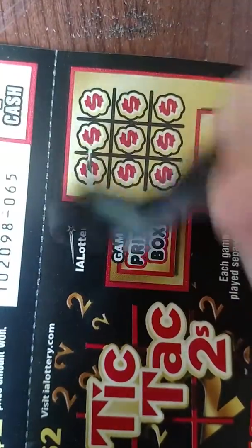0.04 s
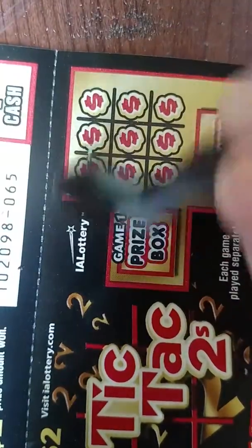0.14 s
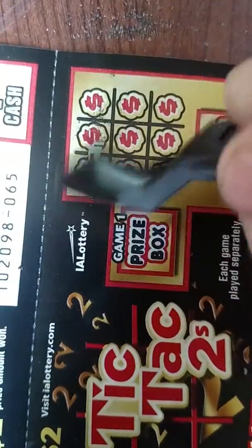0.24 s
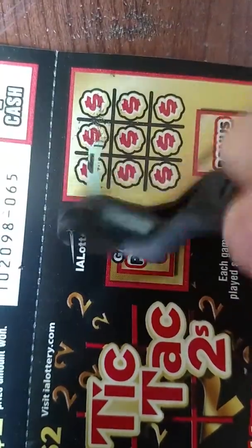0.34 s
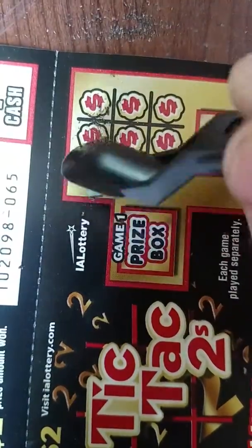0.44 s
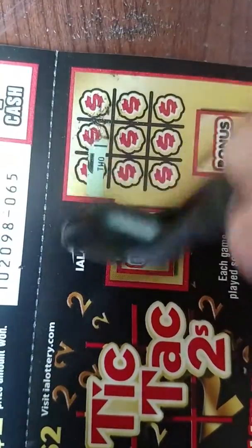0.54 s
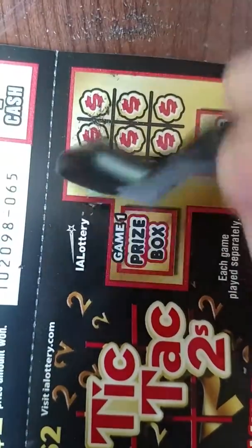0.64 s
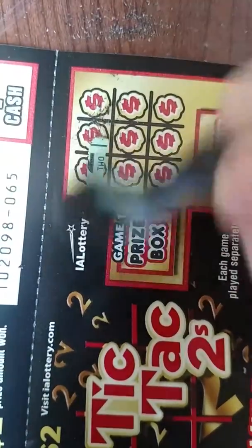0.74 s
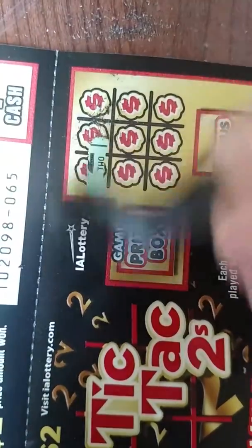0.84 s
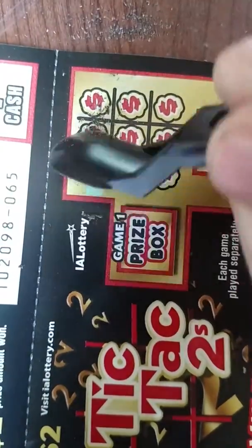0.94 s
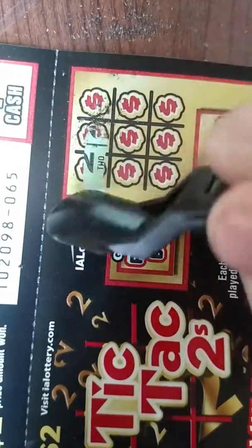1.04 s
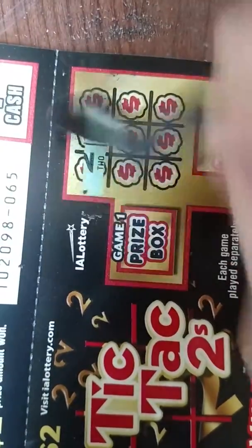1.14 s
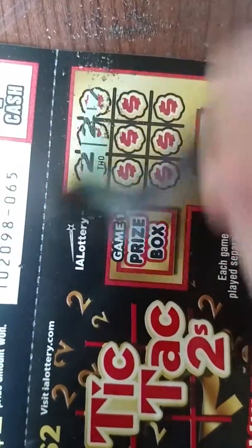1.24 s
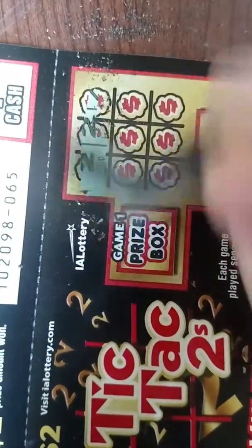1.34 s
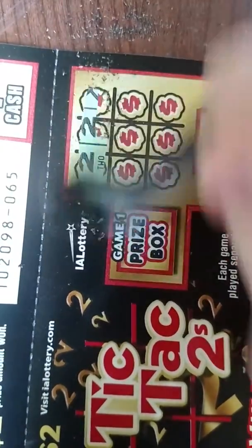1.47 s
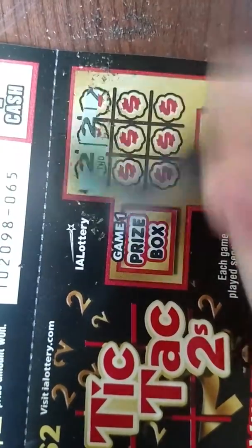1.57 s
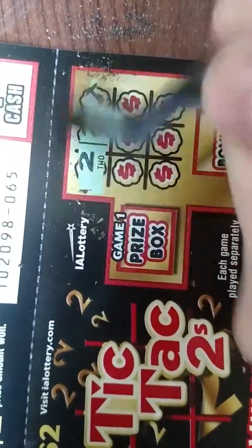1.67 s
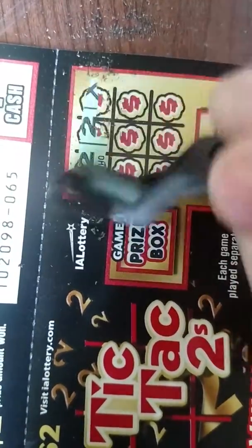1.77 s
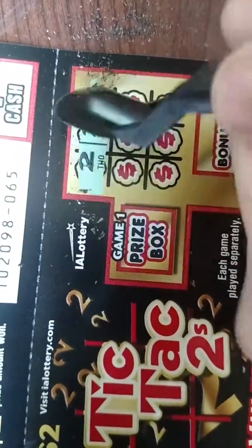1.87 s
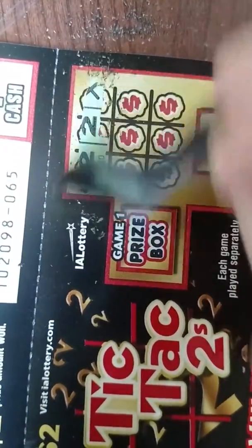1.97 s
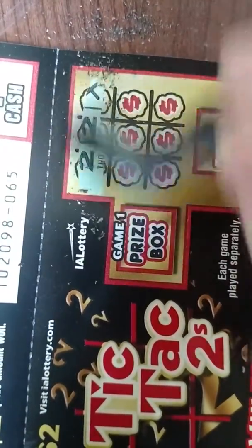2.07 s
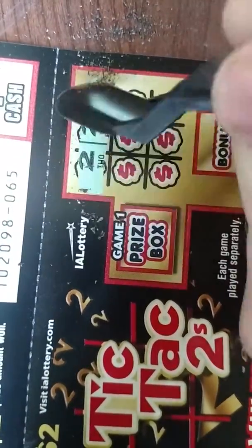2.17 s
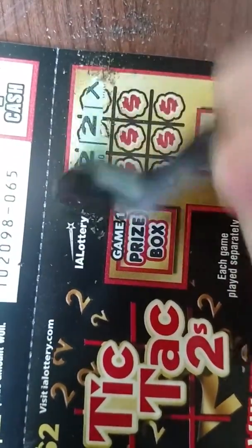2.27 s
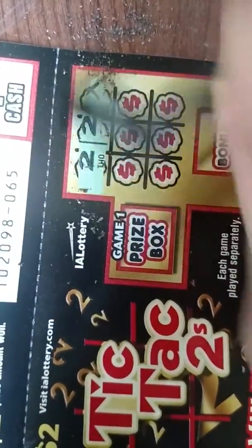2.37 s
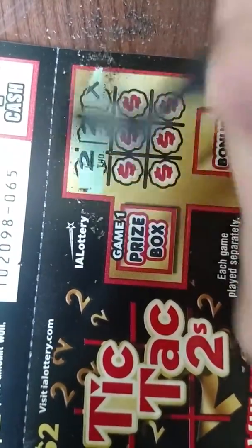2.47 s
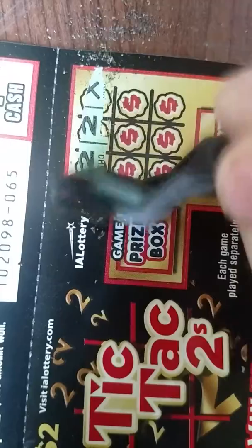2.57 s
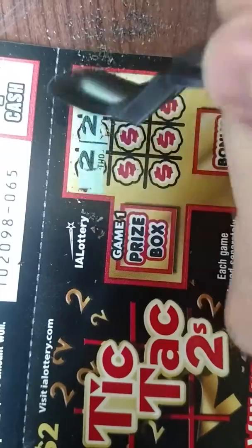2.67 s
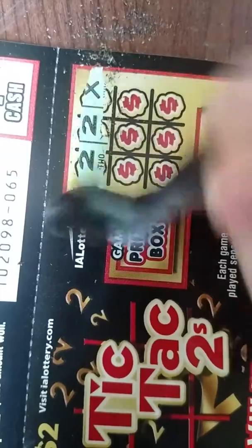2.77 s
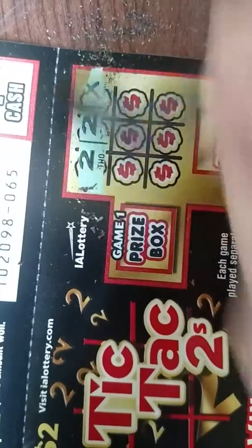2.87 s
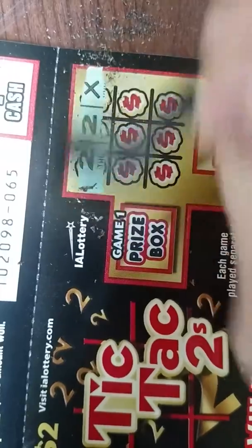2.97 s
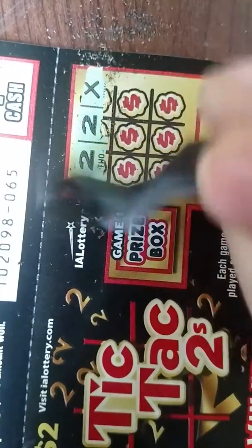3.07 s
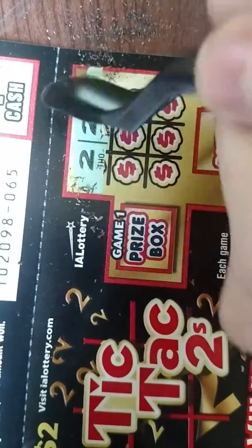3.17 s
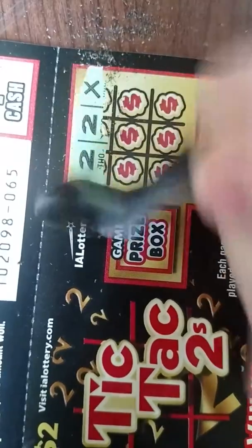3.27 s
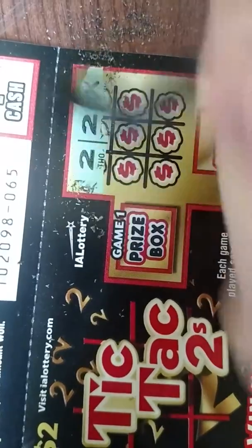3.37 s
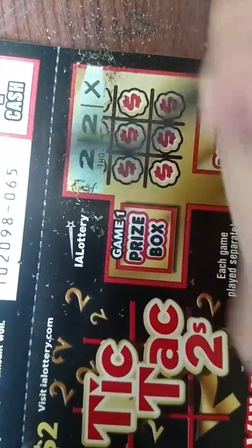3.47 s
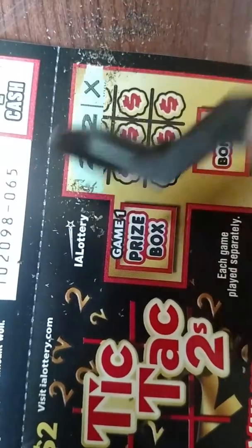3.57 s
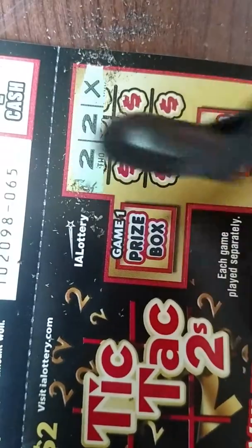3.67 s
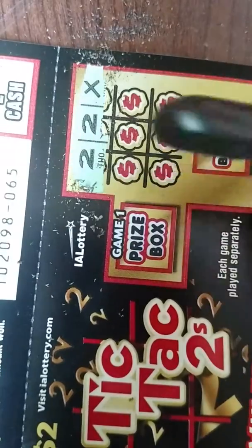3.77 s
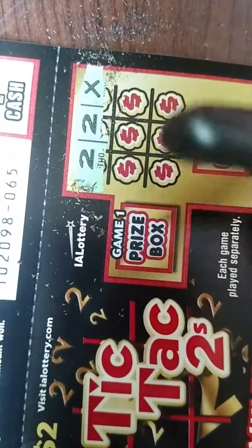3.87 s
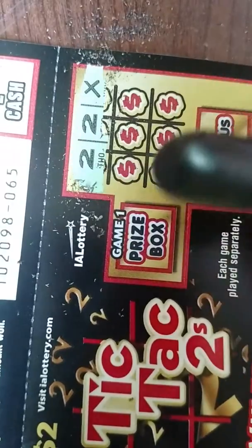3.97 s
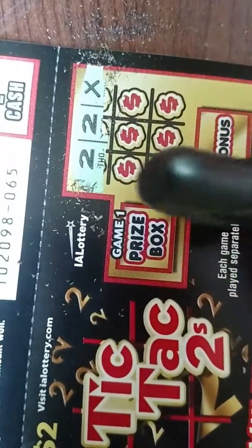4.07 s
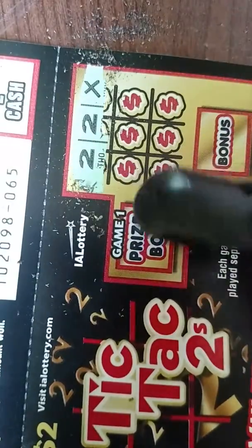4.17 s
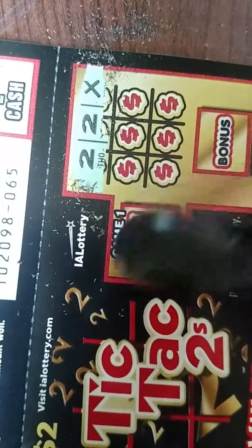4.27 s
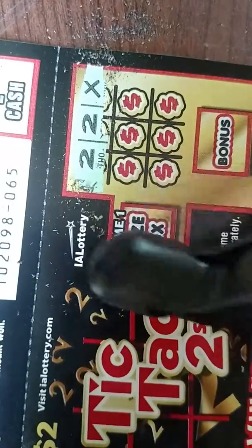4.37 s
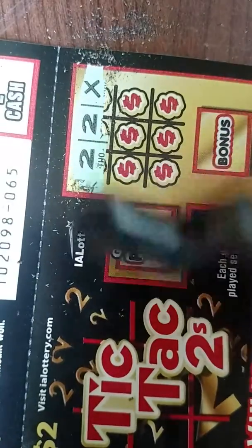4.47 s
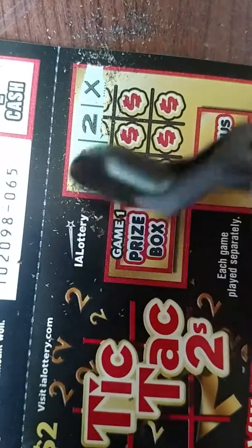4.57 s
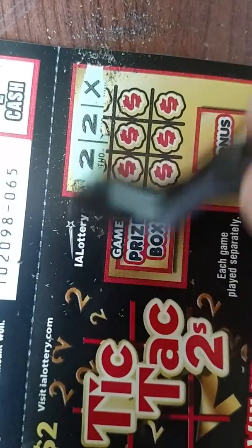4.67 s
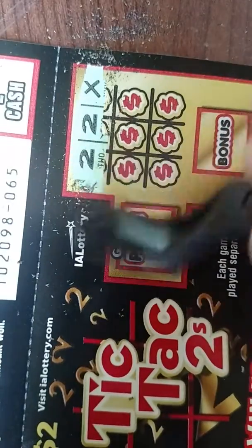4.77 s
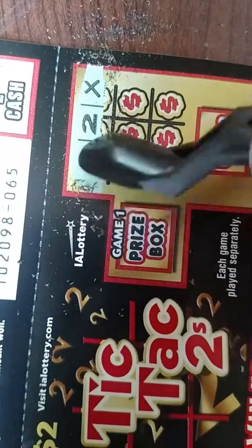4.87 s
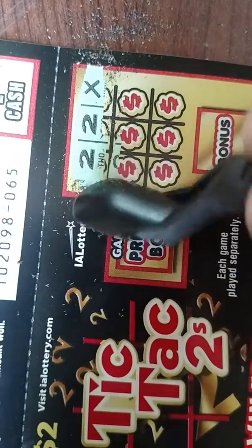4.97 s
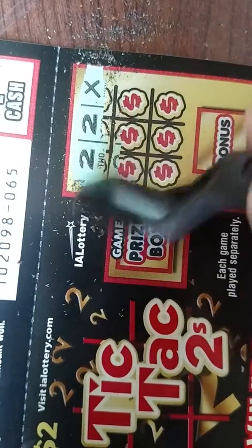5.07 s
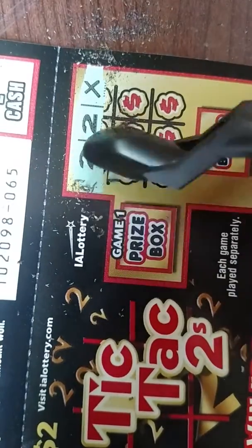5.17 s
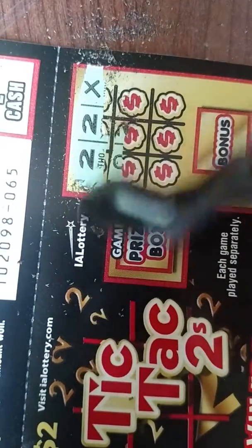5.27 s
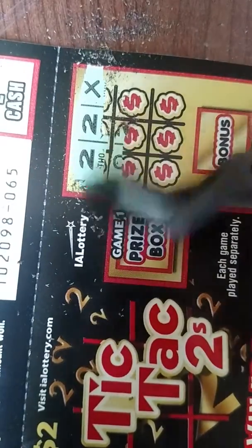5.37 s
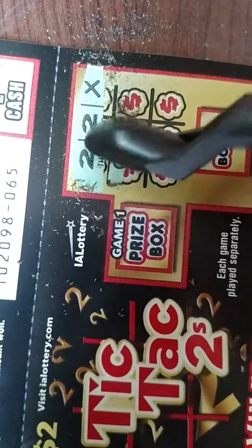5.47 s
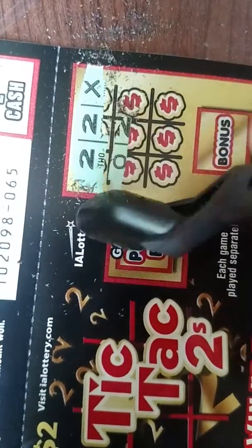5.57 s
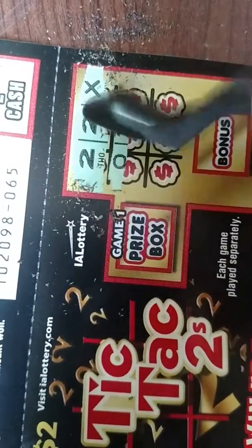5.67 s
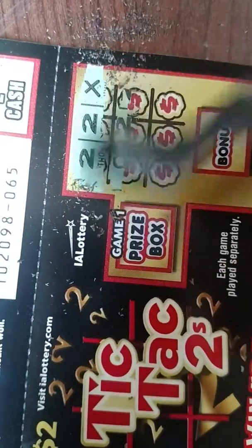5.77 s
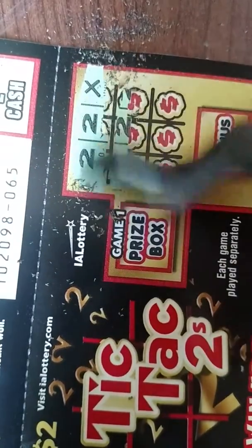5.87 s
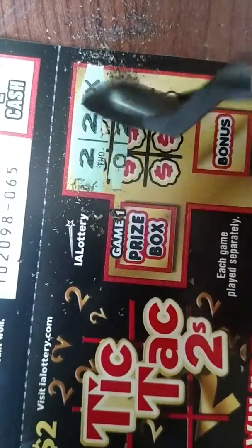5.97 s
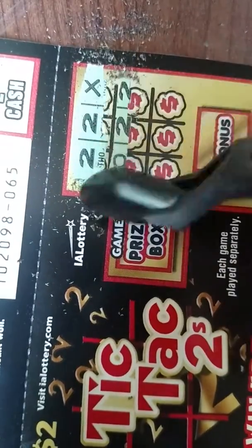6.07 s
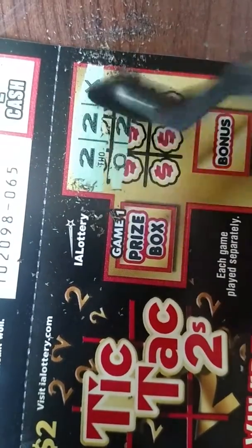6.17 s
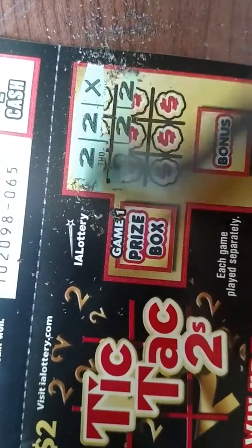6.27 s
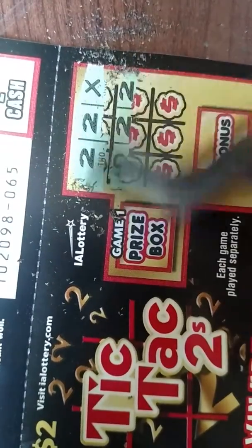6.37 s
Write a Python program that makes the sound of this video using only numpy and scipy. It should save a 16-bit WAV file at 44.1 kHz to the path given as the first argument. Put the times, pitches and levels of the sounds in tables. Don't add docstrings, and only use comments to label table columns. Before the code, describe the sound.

Close to the microphone, a small hard scraper rubs rapidly back and forth over a coated paper ticket on a wooden table. Each short stroke is a gritty, dry rasp over a hollow woody rumble, with irregular thuds as the edge catches. After about three and a half seconds it pauses, leaving quiet room murmur and tiny hand shifts, then the scraping resumes until the end.

```python
import sys
import numpy as np
from scipy import signal
from scipy.fft import rfft, irfft
from scipy.io import wavfile

SR = 44100
rng = np.random.default_rng(int(sys.argv[2]) if len(sys.argv) > 2 else 0)


def boost(x):
    u = np.asarray(x, float) / 20
    return 10 ** u


def persist_wave(psi):
    counts = np.round(np.clip(psi, -1, 1) * 32767).astype(np.int16)
    wavfile.write(sys.argv[1], SR, np.atleast_2d(counts).T)


N = 283122


def table(rows):
    return np.transpose(np.array(rows, float))


def seconds():
    return np.arange(N) / SR


def butter(x, order, hz, kind):
    return signal.sosfilt(signal.butter(order, hz, kind, fs=SR, output="sos"), x)


def wander(rate, depth_db):
    knots = rng.standard_normal(int(N / SR * rate) + 2)
    return boost(depth_db * np.interp(seconds() * rate, np.arange(len(knots)), knots))


def resonance(x, hz, width_hz):
    r = np.exp(-np.pi * max(width_hz, 3) / SR)
    zeros = np.array([1, 0, -1]) * (1 - r * r) / 2
    poles = [1, -2 * r * np.cos(2 * np.pi * hz / SR), r * r]
    return signal.lfilter(zeros, poles, x + 1e-18)


def double_resonance(x, hz, width_hz):
    return resonance(resonance(x, hz, width_hz), hz, width_hz)


def body(force, modes, tilt=None, shift_db=0):
    click = signal.unit_impulse(SR // 2)
    impulse_response = 0
    sound = 0
    for k, (hz, width_hz, level_db) in enumerate(modes):
        gain = (-1) ** k * boost(level_db)
        impulse_response = impulse_response + gain * resonance(click, hz, width_hz)
        drive = force * wander(14, shift_db) + (tilt(hz) if tilt else 0)
        sound = sound + gain * resonance(drive, hz, width_hz)
    return sound / np.sqrt(np.sum(impulse_response ** 2))


def grains(per_s, spread_db):
    sizes = boost(spread_db * np.minimum(rng.exponential(1, N), 4)) * rng.choice([-1, 1], N)
    jolts = sizes * (rng.random(N) < per_s / SR)
    return jolts / np.sqrt(np.mean(jolts ** 2))


# (frequency [Hz], level per Hz [dB])
ROOM = [(30, -20.5), (60, -6), (75, -9), (100, 5.5), (190, -0.5), (450, -8), (550, -10.5), (1300, -16.5),
        (1800, -21.5), (2540, -22), (5680, -31), (15400, -37.5)]


def room():
    hz, level_db = table(ROOM)
    bins = np.arange(1, N // 2 + 2) * SR / N
    spectrum = rfft(rng.standard_normal(N)) * boost(np.interp(np.log(bins), np.log(hz), level_db))
    hush = irfft(spectrum, N)
    return boost(-56.5) * hush / hush.std()


# (time [s], level [dB])
LEAN = [(0.0, -50), (0.21, -61), (0.45, -49), (1.11, -58), (1.21, -50), (2.0, -55), (2.22, -44),
        (2.38, -49), (2.43, -64), (2.52, -46.5), (3.4, -62), (3.43, -47), (4.0, -67), (4.9, -60),
        (4.99, -48), (5.06, -58), (6.31, -45), (6.42, -51)]


def sway():
    s, level_db = table(LEAN)
    rocking = double_resonance(rng.standard_normal(N), 42, 26)
    lean = boost(np.interp(seconds(), s, level_db)) * wander(6, 5)
    return lean * rocking / rocking.std()


# (start [s], length [s], pressure [dB], rub [dB], tearing [dB])
PUSHES = [(-.1, 0.094, -26.5, -31, -60), (.127, 0.075, -32.5, -29.5, -50.5),
          (.372, 0.059, -25.5, -32, -51.5), (.598, 0.082, -23.5, -34.5, -70),
          (.847, 0.077, -26, -32.5, -56), (1.11, 0.07, -22, -32, -57), (1.328, 0.076, -25, -35, -67),
          (1.571, 0.078, -21, -33, -62.5), (1.797, .072, -25.5, -34, -55),
          (2.064, 0.088, -23.5, -34, -60.5), (2.352, 0.085, -25.5, -34.5, -62),
          (2.595, 0.076, -24.5, -34.5, -65.5), (2.843, .077, -25, -33, -61.5),
          (3.09, 0.065, -21, -34.5, -61.5), (3.342, 0.071, -21, -30, -59.5),
          (4.787, 0.081, -32, -32.5, -60), (5.088, 0.087, -31.5, -33, -54.5),
          (5.379, 0.072, -26.5, -32, -50.5), (5.617, 0.077, -30, -29, -50.5),
          (5.879, 0.073, -26, -32, -61.5), (6.114, 0.083, -26, -32, -60.5), (6.365, 0.09, -24.5, -30, -52)]
# (start [s], length [s], pressure [dB], rub [dB], tearing [dB])
PULLS = [(0.016, 0.079, -28, -33, -56), (0.263, 0.068, -30.5, -35, -65), (0.499, .086, -28.5, -37.5, -68.5),
         (0.738, 0.083, -35, -39.5, -64.5), (.98, 0.069, -28.5, -31, -58.5), (1.21, 0.066, -28.5, -30, -51),
         (1.45, .074, -28.5, -33.5, -57), (1.676, 0.089, -29, -37, -69), (1.942, 0.081, -33.5, -39.5, -72),
         (2.227, 0.088, -33, -41.5, -73), (2.466, .11, -28.5, -40, -65.5), (2.709, 0.081, -27, -38, -56),
         (2.958, 0.087, -30.5, -35, -54), (3.22, 0.095, -31.5, -37, -53.5),
         (3.453, 0.068, -37.5, -45.5, -76), (4.654, .1, -38, -43.5, -77.5), (4.915, .072, -26.5, -30, -57),
         (5.242, 0.073, -28, -33, -60), (5.501, .078, -35, -34, -71.5), (5.763, 0.048, -31.5, -35, -63.5),
         (6, 0.061, -30.5, -35, -63.5), (6.243, 0.079, -29, -34, -61)]
# (start [s], length [s], pressure [dB], rub [dB])
FIDGETS = [
    (3.656, 0.047, -49, -51),
    (3.975, .035, -54.5, -64.5),
    (4.127, 0.058, -54, -58),
    (4.474, 0.057, -53, -64),
    (4.59, .08, -45.5, -64),
]


def strokes():
    idle = [(s, length, press_db, rub_db, press_db - 45) for s, length, press_db, rub_db in FIDGETS]
    start, length, press_db, rub_db, tear_db = table(PUSHES + PULLS + idle)
    push = np.arange(len(start)) < len(PUSHES)
    swell_db = np.where(push, 2.5, 2) - 60.5 * (length - .077)
    ping_db = -54.5 + 0.7 * (rub_db + 34) + 0.26 * (tear_db + 58)
    return start, length, press_db, rub_db - swell_db / 2, rub_db + swell_db / 2, ping_db, tear_db, push


def stroke_force(early_db, late_db, rise_s, fall_s, break_db=0, arch_db=0):
    out, t = np.zeros(N), seconds()
    for start, length, a_db, b_db in zip(*strokes()[:2], early_db, late_db):
        first = max(int((start - 4 * rise_s) * SR), 0)
        part = slice(first, int((start + length + 4 * fall_s) * SR))
        u = t[part] - start
        contact = (1 + np.tanh(u / rise_s)) * (1 - np.tanh((u - length) / fall_s)) / 4
        speed_db = arch_db * (1 - np.clip(2 * u / length - 1, -1, 1) ** 2)
        slide_db = a_db + (b_db - a_db) * np.clip(2 * u / length - .5, 0, 1)
        break_free_db = break_db * np.exp(-np.abs(u) / 0.0043)
        out[part] += contact * boost(speed_db + slide_db + break_free_db)
    return out


# (time [s], tearing [dB])
RIPS = [(.307, -62), (.626, -64.5), (.668, -59.5), (.895, -64), (1.159, -49.5), (1.387, -59), (1.633, -58),
        (1.711, -67), (1.842, -52.5), (2.107, -52.5), (2.417, -56), (3.659, -69), (5.52, -63),
        (5.574, -62.5), (5.792, -57.5), (5.94, -63), (6.029, -58), (6.176, -56), (6.271, -55.5),
        (6.415, -47.5)]


def bites():
    start, length, press_db, _, _, _, tear_db, push = strokes()
    middle = start + np.where(push, 0.046, 0.042)
    away = all_catches()[0] - middle[:, None]
    nearest = away[np.arange(len(start)), np.abs(away).argmin(axis=1)]
    middle = middle + .25 * nearest * np.exp(-(nearest / 0.033) ** 4)
    grit_db = -12.5 - 1.4 * np.maximum(press_db - tear_db - 33, 0)
    width = length * np.where(push, .72, 0.77)
    stroke_bites = np.array([middle, width, tear_db, grit_db])
    rips = table([(s, 0.02, db, -13) for s, db in RIPS])
    return np.hstack([stroke_bites, rips])


def bite_force(levels_db, narrow, flat, sudden=0.81):
    t, swell = np.arange(0, N + 32, 32) / SR, 0
    for s, width, level_db in zip(*bites()[:2], levels_db):
        away = 2 * (t - s) / (narrow * width)
        power = np.where(away < 0, flat * sudden, flat)
        swell = swell + boost(level_db - 5.5 * np.abs(away) ** power)
    return np.interp(seconds(), t, swell)


# (frequency [Hz], width [Hz], level [dB])
TABLE_DEEP = [(94, 16, -12.5), (115.9, 10.3, -5.5), (144.9, 9.4, 1.5), (169.8, 7.1, 1), (213.4, 24.6, -6.5),
              (268.2, 15.3, -6.5), (316, 23.7, -7.5), (349, 31.2, -4), (391, 20.7, -1.5),
              (453.5, 12.6, -10)]
# (frequency [Hz], width [Hz], level [dB])
TABLE_STIFF = [(581.3, 23, 3.5), (668, 37.4, -1), (708, 60, -0.5), (766.4, 60, 0.5), (846.6, 68.4, -7),
               (1013.5, 42, -10.5), (1097.5, 23, -10.5), (1197.6, 42.6, -10), (1291, 47, -13.5)]
# (frequency [Hz], width [Hz], level [dB])
TABLE_THIN = [(1509, 30, 0), (1690, 140, -15.5), (1855, 43, -0.5), (2240, 28, -20)]
# (frequency [Hz], width [Hz])
NODE = (536.5, 42.5)


def table_top():
    _, _, press_db, early_db, late_db, ping_db, _, _ = strokes()
    crack_db = all_catches()[3]
    slips = grains(1500, 3.37)

    shake = stroke_force(press_db - 3, press_db - 2.5, rise_s=0.0064, fall_s=0.023, arch_db=3)
    shake += stroke_force(press_db - 10.5, press_db - 12, rise_s=0.033, fall_s=.04)
    shake *= grains(700, 3.4)
    deep = body(shake, TABLE_DEEP, catches(0.0014, 16.0), shift_db=1.5) + thump()

    rub = stroke_force(early_db, late_db, rise_s=.0013, fall_s=.011, break_db=3.0) * slips
    crack = catches(.0004, crack_db + 24)(250)
    stiff = body(rub, TABLE_STIFF, lambda hz: crack, shift_db=2.5)

    glide = stroke_force(ping_db - 5.0, ping_db - 4.5, rise_s=0.0032, fall_s=.006, arch_db=5.0)
    tearing = bite_force(bites()[2] - 3, narrow=0.9, flat=2.9)
    ping = (glide + tearing) * slips
    thin = body(ping + catches(.0003, crack_db - 1.5)(250), TABLE_THIN, shift_db=1.5)

    top = butter(deep, 2, [95, 520], "band")
    top = top + butter(stiff, 2, [480, 1400], "band")
    top = top + butter(thin, 2, [1400, 2100], "band")
    return top - resonance(top, *NODE)


# (frequency [Hz], width [Hz], level [dB])
EDGE = [(2330, 160, -4.5), (2874, 150, 3), (3292, 120, 2.5), (3570, 85, 2.5), (3885, 30, 6),
        (4430, 190, -4), (5220, 210, -2), (5720, 260, -8)]
# (frequency [Hz], width [Hz], level [dB])
GRIT = [(6700, 660, 1), (8300, 300, 1.5), (9950, 650, -5.5), (12200, 900, -16), (14300, 1200, -14)]


def scratch():
    _, _, scratch_db, grit_db = bites()
    ping_db = strokes()[5]
    tearing = grains(6000, 4.0)
    glide = stroke_force(ping_db - 16, ping_db - 24.0, rise_s=.004, fall_s=0.022, arch_db=-2.0)
    bite = bite_force(scratch_db, narrow=0.9, flat=2.8, sudden=1.5)
    ticks = catches(.0001, all_catches()[3] - 6)(250)
    edge = body((bite + glide) * tearing + ticks, EDGE, shift_db=1.5)
    crumbs = bite_force(scratch_db + grit_db, narrow=0.61, flat=1.6, sudden=1.8)
    grit = body(crumbs * tearing, GRIT)
    return butter(edge, 2, [2000, 6100], "band") + butter(grit, 2, 6000, "high")


def walls(x, t60_s, wet_db, dull_hz):
    t = np.arange(int(.5 * SR)) / SR
    tail = rng.standard_normal(len(t)) * boost(-60 * t / t60_s) * (t > .006)
    tail = butter(tail / np.sqrt(np.sum(tail ** 2)), 1, dull_hz, "low")
    return x + boost(wet_db) * signal.fftconvolve(x, tail)[:N]


# (time [s], thump [dB], crack above thump [dB])
EVEN_CATCHES = [(.088, -18.5, -20), (.315, -20, -26), (1.367, -32, -12), (1.985, -23, -12),
                (2.107, -30, -20), (2.549, -14.5, -21), (2.76, -14.5, -32), (4.833, -17.5, -21),
                (5.302, -11, -22), (5.43, -17.5, -23), (5.625, -11.5, -18), (5.813, -30, -13),
                (5.934, -9, -16), (6.176, -16.5, -18)]
# (time [s], thump [dB], crack above thump [dB])
DULL_CATCHES = [(.191, -21.5, -17), (.419, -13, -26), (.65, -12, -24), (.793, -11, -22), (.889, -22, -25),
                (1.161, -10, -23), (1.502, -20.5, -20.5), (1.631, -18, -20), (2.276, -20.5, -15.5),
                (3.654, -20, -14), (4.064, -30, -20.5), (4.159, -43, -21), (4.5, -43, -20),
                (4.66, -26.5, -30), (5.136, -22, -15)]
# (time [s], thump [dB], crack above thump [dB])
SHARP_CATCHES = [(1.04, -25, -12), (1.84, -15, -19), (2.406, -18.5, -7), (2.654, -20, -19),
                 (2.907, -17, -34), (3.043, -19.5, -16), (3.127, -13.5, -21), (3.375, -13.5, -19),
                 (4.979, -17.5, -16), (5.575, -16, -20), (6.311, -21, -13)]


def all_catches():
    kinds = [(DULL_CATCHES, -13.5), (EVEN_CATCHES, -4.5), (SHARP_CATCHES, 12)]
    rows = []
    for events, tilt_db in kinds:
        rows += [(s, thump_db, tilt_db, crack_db) for s, thump_db, crack_db in events]
    return table(rows)


def catches(contact_s, extra_db):
    s, level_db, tilt_db, _ = all_catches()
    push = signal.windows.hann(max(int(contact_s * SR), 3))

    def force(hz):
        clicks = np.zeros(N)
        mode_tilt_db = tilt_db * np.tanh(6.5 * np.log(hz / 250)) / 2
        clicks[(s * SR).astype(int)] = -boost(level_db + extra_db + mode_tilt_db)
        return signal.lfilter(push / push.sum(), 1, clicks)
    return force


# (frequency [Hz], width [Hz], level [dB])
THUMP = [(179.4, 63, -3), (381, 91, -1.5)]


def thump():
    force = catches(.002, 41.5)
    return sum(boost(db) * double_resonance(force(hz), hz, width_hz) for hz, width_hz, db in THUMP)


# (start [s], end [s], frequency [Hz], width [Hz], level [dB])
WHINE = (.55, 1.9, 10790, 120, -89)


def far_whine():
    start, end, hz, width_hz, level_db = WHINE
    whine = double_resonance(rng.standard_normal(N), hz, width_hz)
    fade = np.interp(seconds(), [start, start + .15, end - .15, end], [0, 1, 1, 0])
    return boost(level_db) * fade * whine / whine.std()


# (time [s], frequency [Hz], width [Hz], level [dB])
WRIST = (5.806, 88, 37, -28.5)


def wrist():
    s, hz, width_hz, level_db = WRIST
    click = signal.unit_impulse(N, int(s * SR)) * SR / width_hz
    return boost(level_db) * double_resonance(click, hz, width_hz)


def scene():
    scraping = walls(table_top() + scratch(), t60_s=0.27, wet_db=-10, dull_hz=1200)
    return (scraping + room() + sway() + far_whine() + wrist())[None]


def top_cut(x):
    return signal.sosfilt(signal.butter(12, 15500, fs=SR, output="sos"), x)


def record(dry):
    mix = butter(dry, 6, 37, "high")
    return top_cut(mix)


dry = scene()
out = record(dry)
persist_wave(out)
```